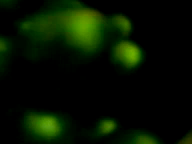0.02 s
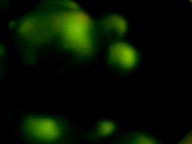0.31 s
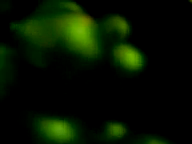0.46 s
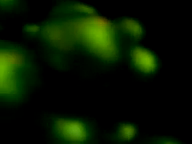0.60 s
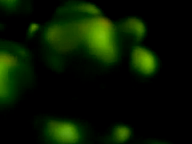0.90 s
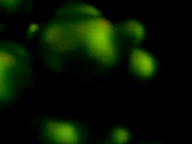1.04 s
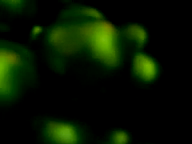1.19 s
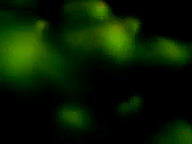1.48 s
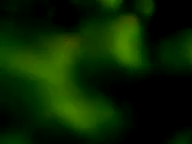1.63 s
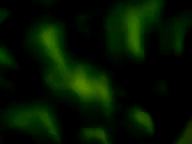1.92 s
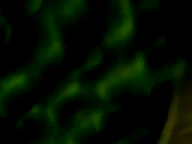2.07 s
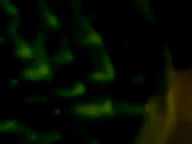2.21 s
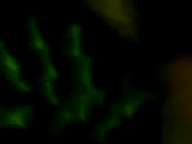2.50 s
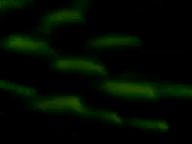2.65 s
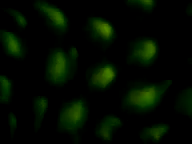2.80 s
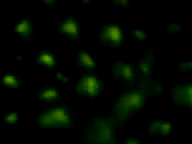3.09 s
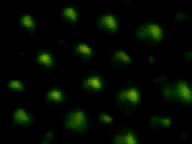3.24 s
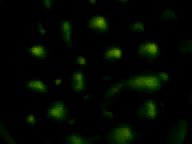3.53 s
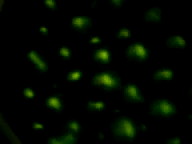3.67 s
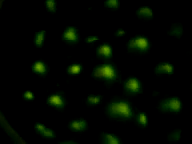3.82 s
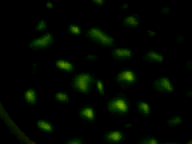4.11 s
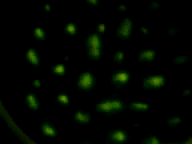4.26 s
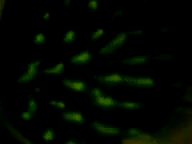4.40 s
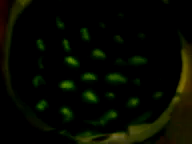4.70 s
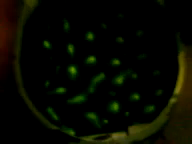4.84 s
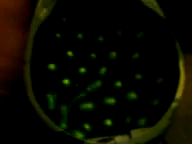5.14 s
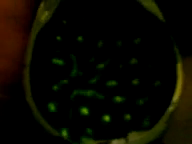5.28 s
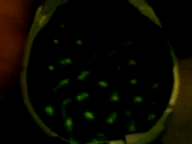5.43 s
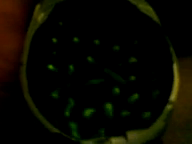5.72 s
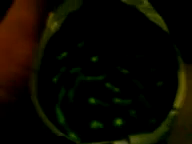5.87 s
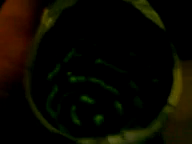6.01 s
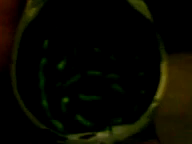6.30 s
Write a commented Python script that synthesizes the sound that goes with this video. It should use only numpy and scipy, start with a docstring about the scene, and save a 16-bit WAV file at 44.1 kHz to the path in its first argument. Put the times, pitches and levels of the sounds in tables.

```python
"""Paintballs pour into a plastic loader hopper, close to a narrow-band microphone.
After a few handling bumps and ticks they clatter brightly on the bare shell, then drum on the
growing heap; the hollow knock climbs a little as the air space shrinks. Nearby walls answer
faintly, over a low hiss. The hardest hits overload the microphone."""
import sys
import numpy as np
from scipy import signal
from scipy.fft import rfft, irfft, next_fast_len
from scipy.io import wavfile
from scipy.ndimage import uniform_filter1d

SR = 44100
rng = np.random.default_rng(int(sys.argv[2]) if len(sys.argv) > 2 else 0)


def unload_wav(signal):
    """Save mono or channel-first audio to the path in sys.argv[1] as 16-bit WAV at rate SR, clipped to [-1, 1]."""
    wavfile.write(
        sys.argv[1],
        SR,
        np.round(np.clip(np.atleast_2d(signal).T, -1, 1) * 32767).astype(np.int16),
    )


N = 280917

# colour of the background hiss: f/Hz, level/dB
HISS_COLOUR = [(15, -65.5), (25, -39.5), (65, -24), (366, -17), (443, -9), (483, -9.5), (623, -6.5),
               (858, -8.5), (1260, -9.5), (1560, -8.5), (2240, -10.5), (2650, -8), (2890, -13), (3350, -8),
               (4060, -24.5), (5280, -46.5), (8930, -120)]
# drift of the hiss: t/s, level/dB
HISS_DRIFT = [(0, -65), (.3, -69), (.9, -67.5), (1.2, -70)]
# soft handling bumps: t/s, level/dB, f/Hz, swell (half the time to the crest)/s
HANDLING_BUMPS = [(0.242, -40, 546, 0.0013), (1.051, -19, 465, 0.0019), (1.0598, -36, 458, 0.0013)]
# light plastic ticks before the pour: t/s, level/dB, clack over knock/dB
PLASTIC_TICKS = [(0.2407, -47.5, -2), (1.031, -34, 10), (1.05, -38, -19), (1.3255, -37, 29),
                 (1.3549, -18.5, 52)]
# growth of the heap: t/s, fill (0 bare shell, 1 low heap, 2 nearly full)
HOPPER_FILL = [(1.95, 0), (2.2, 0.41), (2.45, 0.77), (4.1, 1.09), (5.0, 1.41)]
# colour of a contact at fill 0, 1 and 2: f/Hz, level/dB
BARE_COLOUR = [(15, -72), (25, -38.5), (81, -19), (215, -21.5), (343, -9.5), (407, -14.5), (453, -2.5),
               (526, -7), (637, -7), (1130, -4), (1620, 0), (1810, -0.5), (2380, 0), (3010, -1.5),
               (4060, -29.5), (5280, -60.5), (8930, -120)]
HEAP_COLOUR = [(15, -57.5), (25, -44), (59, -22), (255, -16), (514, -6), (637, -0.5), (723, 2), (876, 1),
               (1130, -5.5), (1430, -4), (1730, -10.5), (2010, -4.5), (2770, -20.5), (3280, -17.5),
               (4060, -38.5), (5280, -55), (8930, -120)]
FULL_COLOUR = [(15, -68), (25, -35.5), (100, -22), (244, -21.5), (453, -4), (514, -12), (755, 0), (895, -1),
               (1180, -15), (1490, -11.5), (1770, -15.5), (2010, -18), (2770, -23.5), (3280, -23),
               (4060, -43), (5280, -69.5), (8930, -120)]
# the stream of balls surges and slackens: t/s, level/dB
POUR_SURGES = [(1.46, -27.5), (1.67, -25.5), (1.76, -32.0), (1.81, -26.5), (2.26, -21.0), (2.31, -24.5),
               (2.5, -21.0), (2.73, -26.0), (2.78, -21.5), (3.13, -26.5), (3.56, -20.5), (3.77, -24.0),
               (3.88, -20.5), (4.71, -24.0), (4.76, -21.0), (5.85, -22.5), (6.12, -19.0), (6.36, -22.5)]
# single hard hits: t/s, relative level/dB, clack over knock/dB, knock f/Hz, clack f/Hz
HARD_HITS = [(1.4826, -4.5, -0.5, 955, 1640), (1.5457, -12, -4.5, 810, 1710), (1.5646, -7.5, -5, 610, 2080),
             (1.5914, -8.5, -13, 960, 1870), (1.6691, -7.5, -3, 690, 1690), (1.6786, -4.5, 5, 740, 1620),
             (1.7012, -8, 18, 817, 2530), (1.7886, -10, 19, 745, 1600), (1.822, -6, 22, 870, 1660),
             (1.9063, -4, 15.5, 830, 1690), (1.9281, -2.5, 13, 630, 2950), (1.9597, 0, -2.5, 640, 1580),
             (1.9691, -11.5, -1, 644, 2850), (1.9899, -5, 25, 810, 2400), (2.041, -5.5, -0.5, 660, 1680),
             (2.0602, -2.5, 1.5, 620, 2155), (2.1573, 0.5, -9.5, 660, 2500), (2.1804, -2.5, -3, 640, 1370),
             (2.1871, -1, -9.5, 650, 1344), (2.233, -5, -12.5, 640, 1370), (2.265, -4.5, -19, 654, 1930),
             (2.2914, 0, 5.5, 810, 2060), (2.3211, -3, -1, 820, 2050), (2.4174, -5.5, -14, 660, 1300),
             (2.5003, -12, 0, 810, 1950), (2.5783, -9, -7, 890, 1300), (2.7086, -8, -7, 656, 1340),
             (2.7312, -2.5, 4, 910, 2050), (2.8577, -7, -14, 880, 1940), (2.9052, 1, -15, 620, 1400),
             (2.9112, -10.5, -10, 640, 1300), (2.9494, -6.5, -1, 890, 1420), (3.0154, -3.5, 1, 660, 1466),
             (3.0505, -8.5, -1.5, 704, 1405), (3.0826, -7, -14, 710, 1276), (3.2386, -8.5, -12, 660, 1940),
             (3.261, -5.5, -10.5, 670, 2160), (3.2927, -7, 1, 676, 1465), (3.4461, -6.5, 2, 880, 2200),
             (3.4909, -2, -11, 680, 1620), (3.5522, -11.5, -5, 720, 1420), (3.6088, -7.5, -7, 747, 1980),
             (3.7204, -8.5, -18, 637, 1565), (3.9081, -4, 7, 640, 1850), (3.9534, -4, -1.5, 890, 1230),
             (4.0272, -8.0, -18.5, 643, 2180), (4.0866, -8.5, -15, 646, 1480),
             (4.1492, -8.5, -4, 620, 1256), (4.2723, -7, 1, 620, 1480), (4.2844, -6, -6.5, 714, 1940),
             (4.5313, -6.0, -6, 814, 1950), (4.622, -5.5, 5.5, 867, 1495), (4.7493, -5.5, -1, 650, 1540),
             (4.781, -6.0, -3.5, 777, 1335), (4.9297, -9, -18, 770, 1910), (4.9627, -7.5, -8, 820, 1400),
             (5.0927, -10, -26, 713, 1393), (5.2767, -12.5, -12, 720, 2240), (5.3309, -9, -12, 597, 1600),
             (5.3936, -6.0, -4, 735, 1450), (5.479, -4.5, -3, 870, 1480), (5.5474, -5.5, -3, 830, 2030),
             (5.8438, -5.5, -9, 900, 1450), (5.9136, -8.5, -30, 733, 1980), (6.0267, -6.0, 0, 714.7, 1590),
             (6.1209, -6.5, -14, 880, 1967), (6.2566, -6, -4, 672, 1980), (6.3396, -4, -3, 824, 1400)]

# a typical ball at fill 0, 1 and 2
CLACK_OVER_KNOCK_DB = [10, 0.5, -1]
KNOCK_HZ, CLACK_HZ = [638, 724, 856], [2226, 1924, 1892]
POUR_START_S, POUR_ATTACK_S = 1.412, .05
GRAZE_DB = 23.5  # the very first balls only graze the shell: all clack, no knock
BALL_T60_S, BALL_GAP_S, BALL_LOSS_DB = .035, .008, 2  # decay, time between rebounds, loss at each
FORCE_SPREAD_DB, HARDNESS_SPREAD_DB, BOUNCE_SPREAD_DB = 2.5, 6.5, 1.87


def amp(db):
    """Decibels to gain."""
    return 10 ** (np.asarray(db) / 20)


def unit_rms(x):
    """Each row scaled to rms 1."""
    return x / np.sqrt(np.mean(x ** 2, axis=-1, keepdims=True) + 1e-20)


def colour_at(points, hz):
    """A colour table read on a log frequency axis."""
    f, db = np.transpose(points)
    return np.interp(np.log(hz + 1), np.log(f + 1), db)


def curve_at(points, times):
    """A curve read at the given times."""
    return np.interp(times, *np.transpose(points))


def filtered(x, response):
    """x through a gain that depends on frequency."""
    size = next_fast_len(N + SR // 2)
    return irfft(rfft(x, size) * response(np.fft.rfftfreq(size, 1 / SR)), size)[:N]


def minimum_phase(db):
    """Responses for rows of dB per bin that ring after the blow, never before."""
    cepstrum = irfft(np.log(amp(np.maximum(db, -100))))
    half = cepstrum.shape[-1] // 2
    cepstrum[:, 1:half] *= 2
    cepstrum[:, half + 1:] = 0
    return np.exp(rfft(cepstrum))


def placed(times, sounds):
    """Rows of sound summed at their start times."""
    index = np.round(np.asarray(times) * SR).astype(int)[:, None] + np.arange(sounds.shape[1])
    return np.bincount(np.maximum(index, 0).ravel(), sounds.ravel(), N)[:N]


def hiss():
    """A faint hiss behind everything, drifting slightly in level."""
    noise = filtered(rng.standard_normal(N), lambda hz: amp(colour_at(HISS_COLOUR, hz)))
    return unit_rms(noise) * amp(curve_at(HISS_DRIFT, np.arange(N) / SR))


def walls(sound, t60=.29, build_s=.0057, level_db=-16.5):
    """A short, faint answer from the walls near the hopper."""
    t = np.arange(SR // 3) / SR
    tail = rng.standard_normal(len(t)) * amp(-60 * t / t60) * (1 - np.exp(-t / build_s))
    return amp(level_db) * signal.fftconvolve(sound, tail / np.linalg.norm(tail))[:N]


def resonance(hz, centre_hz, width_hz, gain_db):
    """dB added by one ringing mode, a row for each centre pitch."""
    detuning = (hz - centre_hz[:, None]) / (width_hz / 2)
    return 10 * np.log10(1 + amp(gain_db) ** 2 / (1 + detuning ** 2))


def contacts(rows, strike_db, ring_db, attack_s, split_hz=1150, size=1280):
    """A sharp strike and a short scuff ring the hopper: a hollow knock below, a shell clack above."""
    starts, peak_db, clack_db, t60, knock_hz, clack_hz = np.transpose(rows)
    t, hz = np.arange(size) / SR, np.fft.rfftfreq(size, 1 / SR)
    noise = rng.standard_normal((len(starts), size))
    push = noise * amp(-60 * t / t60[:, None]) * (1 - np.exp(-t / attack_s))
    push *= np.clip(4 * (1 - t / t[-1]) - 1, 0, 1)  # the scuff ends early, leaving time to ring
    push[:, 0] = np.sign(noise[:, 0]) * amp(strike_db) * np.linalg.norm(push, axis=1)
    # the heap damps the shell's treble as it grows
    fill = curve_at(HOPPER_FILL, starts)[:, None]
    colour = sum(np.maximum(1 - abs(fill - k), 0) * colour_at(stage, hz)
                 for k, stage in enumerate((BARE_COLOUR, HEAP_COLOUR, FULL_COLOUR)))
    # every spot that is struck favours its own two pitches
    colour += resonance(hz, knock_hz, width_hz=76, gain_db=ring_db - 1.5)
    colour += resonance(hz, clack_hz, width_hz=93, gain_db=ring_db)
    ring = irfft(rfft(push) * minimum_phase(colour))
    crossover = [signal.butter(2, split_hz, side, fs=SR, output="sos") for side in ("low", "high")]
    knock, clack = (unit_rms(signal.sosfilt(np.tile(sos, (2, 1)), ring)) for sos in crossover)
    hit = knock + amp(clack_db)[:, None] * clack
    return placed(starts, hit / abs(hit).max(axis=1, keepdims=True) * amp(peak_db)[:, None])


def handling_bumps():
    """Padded bumps on the hopper that swell and die within a few cycles."""
    starts, db, hz, swell_s = np.transpose(HANDLING_BUMPS)[:, :, None]
    t = np.arange(SR // 20) / SR
    age = t / (2 * swell_s)
    envelope = (age * np.exp(1 - age)) ** 4
    return placed(starts[:, 0], amp(db) * envelope * np.sin(2 * np.pi * hz * t))


def plastic_ticks(knock_hz=700, clack_hz=2860):
    """Light ticks of plastic; the empty shell rings on faintly after each."""
    tick, after_ring = (0, .022), (-14.5, .19)  # level/dB, t60/s
    rows = [(start, peak_db + part_db, clack_db, t60, knock_hz, clack_hz)
            for start, peak_db, clack_db in PLASTIC_TICKS
            for part_db, t60 in (tick, after_ring)]
    return contacts(rows, strike_db=-6, ring_db=5, attack_s=.0003, size=4096)


def by_fill(values, times):
    """A property of the hopper over time, from its values when bare, low and nearly full."""
    return np.interp(curve_at(HOPPER_FILL, times), np.arange(len(values)), values)


def pour_onset(times):
    """Rises from 0 to 1, gently at first, as the pour sets in."""
    return np.clip((times - POUR_START_S) / POUR_ATTACK_S, 0, 1) ** 2


def stream_strength(times, stir=1.1, settle_s=.017, trim_db=-.12):
    """The rattle follows the pour and flares as each hard hit stirs the other balls."""
    starts, hit_db = np.transpose(HARD_HITS)[:2]
    age = np.arange(SR // 5) / SR / (settle_s / 2)
    stirred = placed(starts, amp(hit_db)[:, None] * age * np.exp(-age))
    return pour_onset(times) * amp(curve_at(POUR_SURGES, times) + trim_db) * (1 + stir * stirred)


def rattle(count=480, touches=3):
    """About a hundred balls a second land and rebound quickly, each at its own two pitches."""
    t = np.arange(N) / SR
    landing = POUR_START_S + (t[-1] - POUR_START_S) * (np.arange(count) + 1.5 * rng.random(count)) / count
    force, hardness, decay, knock_tune, clack_tune, spring = rng.standard_normal((6, count)).clip(-2, 2)
    graze_db = GRAZE_DB * (1 - pour_onset(landing))
    clack_db = by_fill(CLACK_OVER_KNOCK_DB, landing) + graze_db + HARDNESS_SPREAD_DB * hardness
    knock_hz = by_fill(KNOCK_HZ, landing) * np.exp(.17 * knock_tune)
    clack_hz = by_fill(CLACK_HZ, landing) * np.exp(.26 * clack_tune)
    t60 = BALL_T60_S * np.exp(.25 * decay)
    # each rebound comes an uneven gap later and tends to be weaker
    bounce = np.arange(touches)[:, None]
    gaps = BALL_GAP_S * np.exp(.4 * spring) * rng.uniform(.5, 1.5, (touches, count)) * (bounce > 0)
    times = landing + np.cumsum(gaps, axis=0)
    levels = FORCE_SPREAD_DB * force - BALL_LOSS_DB * bounce
    levels += BOUNCE_SPREAD_DB * rng.standard_normal((touches, count))
    rows = np.vstack([np.transpose([starts, db, clack_db, t60, knock_hz, clack_hz])
                      for starts, db in zip(times, levels)])
    balls = contacts(rows, strike_db=-3, ring_db=11, attack_s=.0006)
    # evened out over 55 ms, so that the stream sets the loudness
    running_rms = np.sqrt(abs(uniform_filter1d(balls ** 2, int(.055 * SR))) + 1e-6)
    return balls / running_rms * stream_strength(t)


def hard_hits(landing_db=-1, rebound_db=-10, rebound_s=.009):
    """Balls fall straight onto the shell or the top of the heap and bounce once, more softly."""
    starts, hit_db, clack_db, knock_hz, clack_hz = np.transpose(HARD_HITS)
    t60 = .019 * amp(hit_db) ** .46  # weaker hits are shorter
    flight = rebound_s * rng.uniform(.6, 1.4, len(starts))
    rows = np.vstack([np.transpose([starts + delay, hit_db + gain_db, clack_db, t60, knock_hz, clack_hz])
                      for delay, gain_db in ((0, landing_db), (flight, rebound_db))])
    return contacts(rows, strike_db=1, ring_db=10, attack_s=.00064)


def scene():
    """Close to the hopper: handling, then the pour and its answer from the walls, over the hiss."""
    balls = rattle() + hard_hits()
    reflections = walls(balls)
    return (handling_bumps() + plastic_ticks() + balls + reflections + hiss())[None]


def record(dry, band_hz=4500, edge_hz=550, soft_limit=.8, hard_limit=.71, top_hz=15800):
    """The microphone rounds strong peaks and passes the voice band; the hardest clip flat and click."""
    rounded = dry[0] / (1 + abs(dry[0] / soft_limit) ** 7) ** (1 / 7)
    narrow = filtered(rounded, lambda hz: np.clip((band_hz - hz) / edge_hz, 0, 1))
    clipped = np.clip(narrow, -hard_limit, hard_limit)
    return filtered(clipped, lambda hz: hz < top_hz)[None]


dry = scene()
out = record(dry)
unload_wav(out)
```